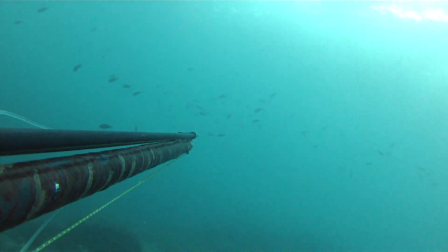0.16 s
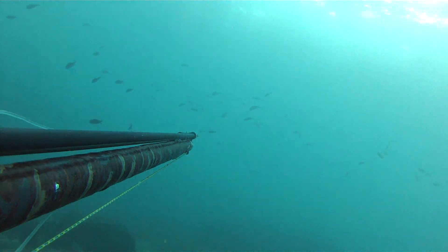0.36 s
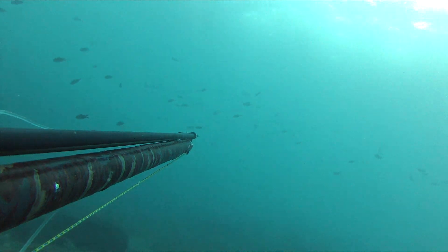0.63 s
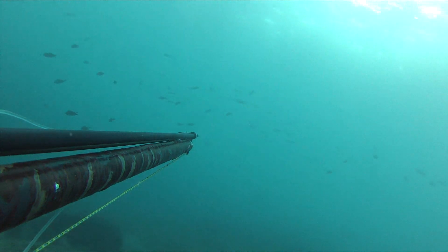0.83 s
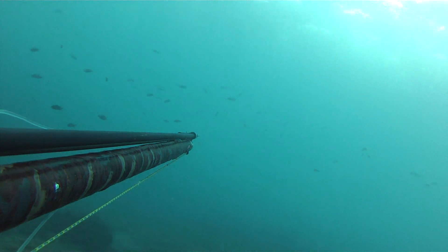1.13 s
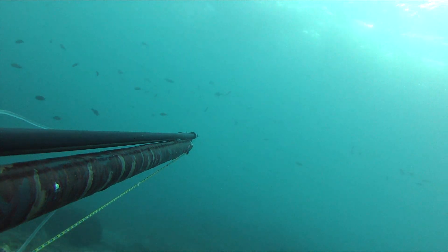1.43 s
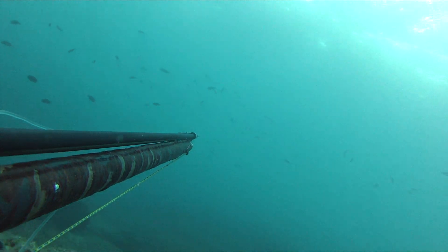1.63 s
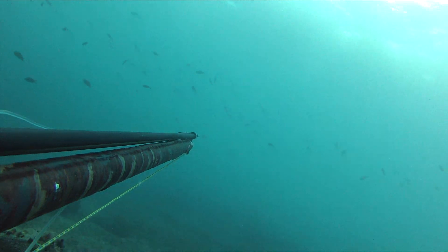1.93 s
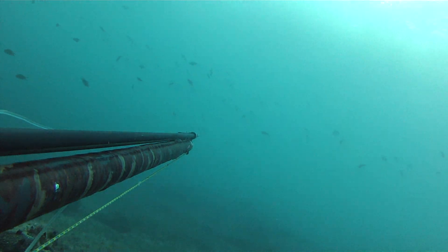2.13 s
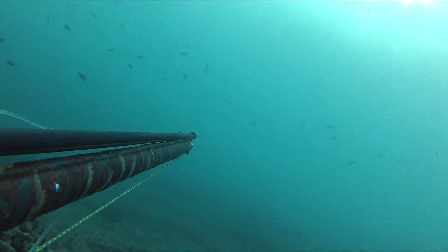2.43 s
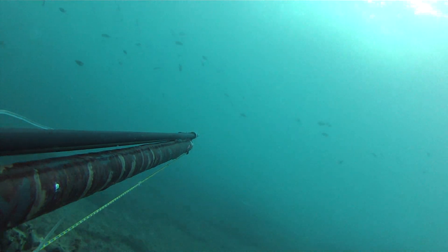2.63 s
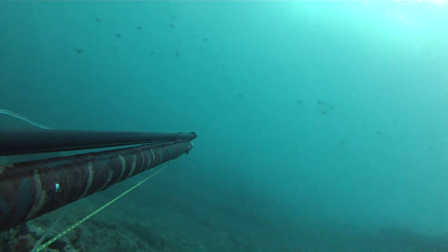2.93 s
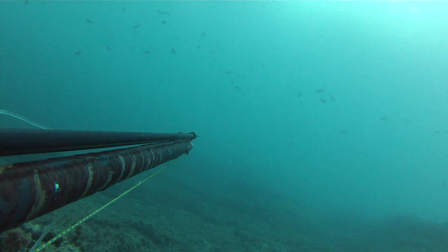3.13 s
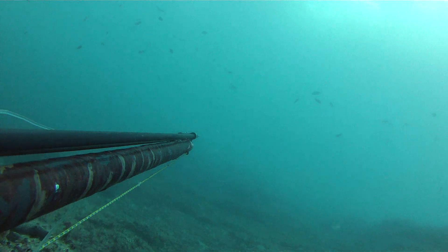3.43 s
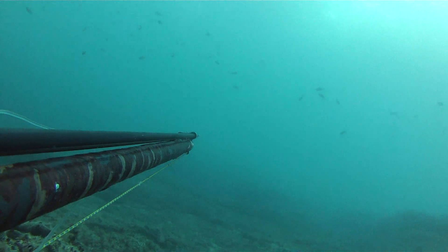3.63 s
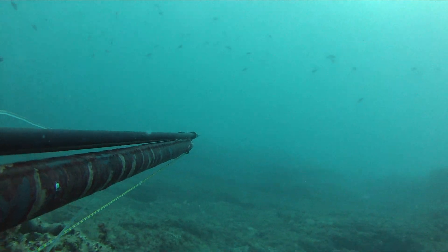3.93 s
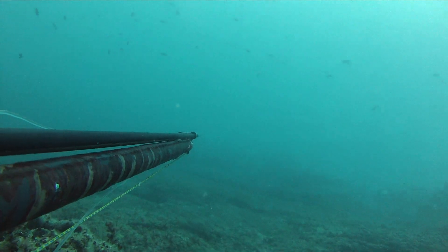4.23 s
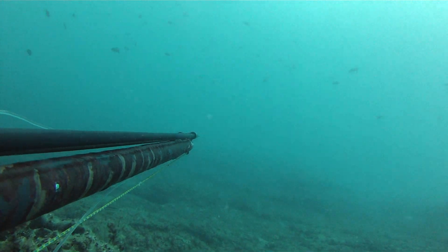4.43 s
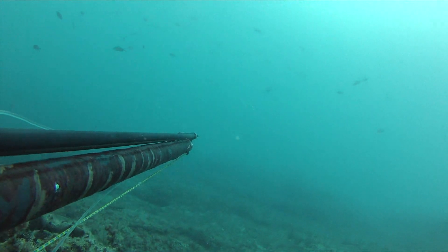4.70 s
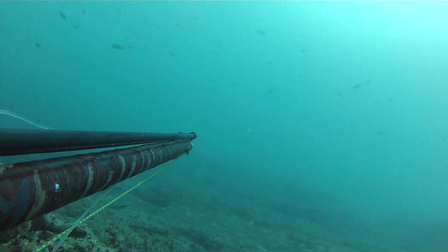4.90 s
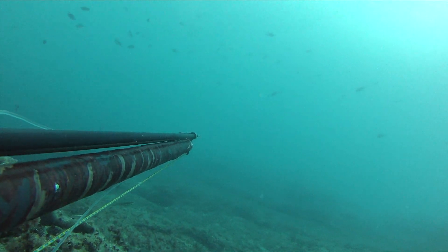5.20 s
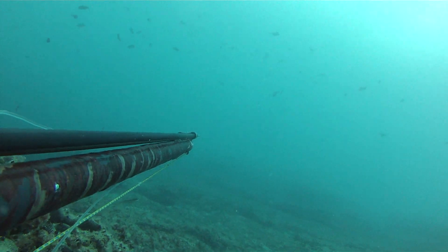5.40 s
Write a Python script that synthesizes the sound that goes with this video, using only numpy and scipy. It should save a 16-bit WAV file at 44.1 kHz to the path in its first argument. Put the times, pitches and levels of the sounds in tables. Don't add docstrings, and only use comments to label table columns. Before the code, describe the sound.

Muffled underwater scene: steady fine snapping, sharper nearby cracks, and squeaky handling bumps and thuds, thickest just before three seconds.

```python
import sys
import numpy as np
from scipy import signal
from scipy.io import wavfile
from scipy.ndimage import uniform_filter1d

SR = 44100
rng = np.random.default_rng(int(sys.argv[2]) if len(sys.argv) > 2 else 0)


def amplitude_ratio(level_db):
    exponent = np.asarray(level_db, float) / 20
    return 10 ** exponent


def dump_mix(stems):
    frames = np.atleast_2d(stems).T
    limited = np.clip(frames, -1, 1)
    pcm = np.round(limited * 32767).astype(np.int16)
    wavfile.write(sys.argv[1], SR, pcm)


N = 245195

# time in seconds, peak in dB, wall mode in Hz, lid re peak in dB.
SLIPS = [(0.6, -27, 590, -11), (0.768, -35, 635, -10), (0.795, -37, 540, -3), (0.848, -28.5, 552, -3),
         (0.88, -30, 530, -7.5), (1.158, -53, 646, 11.5), (1.196, -29.5, 636, -11), (1.475, -30.5, 632, -9),
         (1.544, -33.5, 614, 2.5), (1.822, -22.5, 614, -8.5), (1.944, -45, 596, 3), (2.309, -43, 540, 7),
         (2.435, -36, 520, -2.1), (2.467, -13, 635, -4.5), (2.588, -19, 586, -4), (2.631, -24, 592, -8),
         (2.657, -13, 584, -7), (2.678, -12, 560, -6), (2.7, -14.5, 603, -5.5), (2.729, -25.5, 514, 3.5),
         (2.76, -8.5, 562, -7), (2.785, -21.5, 510, -8), (2.816, -20, 584, -10), (3.275, -52.5, 447, 13),
         (3.835, -28.5, 648, -17), (4.173, -36, 573, -9), (4.847, -32.5, 635, -11), (5.06, -30.5, 631, -9),
         (5.342, -30, 615, -12.5)]
# frequency in Hz, bandwidth in Hz, level in dB.
LID = [(812, 61, -14), (929, 49, -2), (1033, 55.5, 0), (1208, 53.4, 1), (1285, 54, 5.5), (1332, 101, 2.5),
       (1425, 84, -1), (1998, 86, -12.5), (2367, 78, -16.5), (2930, 87, -27), (3700, 340, -23.5)]
# frequency in Hz, bandwidth in Hz, level in dB.
PORT = [(1175, 97, 2.5), (1680, 144, -4), (2006, 51, 0.5), (2219, 110, -0.5), (2800, 295, -3.5),
        (3600, 188, -1), (4130, 294, -2.5), (5284, 520, -4), (6390, 460, -5), (7270, 640, -5.5),
        (7950, 4100, -13.5), (11400, 1300, -41.5)]


def rms_one(x):
    return x / np.sqrt(np.mean(x ** 2) + 1e-20)


def drift(rate):
    r = np.exp(-80 * np.pi * rate / SR)
    steps = rng.standard_normal(N // 40 + 2002)
    slow = signal.lfilter([1], [1, -2 * r, r * r], steps)[2000:]
    return np.interp(np.arange(N) / 40, np.arange(len(slow)), rms_one(slow))


def resonance(x, hz, width_hz):
    r = np.exp(-np.pi * width_hz / SR)
    zeros = np.array([1, 0, -1]) * (1 - r * r) / 2
    poles = [1, -2 * r * np.cos(2 * np.pi * hz / SR), r * r]
    return signal.lfilter(zeros, poles, x)


def body(x, modes):
    return sum((-1) ** k * amplitude_ratio(db) * resonance(x, hz, width) for k, (hz, width, db) in enumerate(modes))


def band(x, kind, hz, order=2):
    return signal.sosfilt(signal.butter(order, hz, kind, fs=SR, output="sos"), x)


def grains(per_s, spread_db):
    signs = rng.choice([-1, 1], N)
    sizes = amplitude_ratio(spread_db * np.minimum(rng.exponential(1, N), 4)) * signs
    return sizes * (rng.random(N) < per_s / SR) + 1e-18


def add(out, s, sound, peak_db):
    at = round(s * SR)
    out[at:at + len(sound)] += (amplitude_ratio(peak_db) * sound / np.max(np.abs(sound)))[:N - at]


def swells(start_s, hold_s, peak_db, rest_db, rise_db_per_s, fall_db_per_s):
    t = np.arange(0, N, 64)[:, None] / SR
    rise_db = rise_db_per_s * np.maximum(start_s - t, 0)
    fall_db = fall_db_per_s * np.maximum(t - start_s - hold_s, 0)
    power = amplitude_ratio(2 * rest_db) + amplitude_ratio(2 * (peak_db - rise_db - fall_db)).sum(axis=1)
    return np.interp(np.arange(N) / SR, t[:, 0], np.sqrt(power))


def knock(t, hz, rise_s, fall_s):
    swell = np.sin(np.pi / 2 * np.clip(t / rise_s, 0, 1)) ** 2
    ring_out = np.exp(-(np.maximum(t - rise_s, 0) / fall_s) ** 2)
    return np.sin(2 * np.pi * hz * t) * swell * ring_out


def hiss():
    shared_db, apart_db, tilt = -65, -72, 0.62
    shared, apart = band(rng.standard_normal((2, N)), "high", 210)
    shared = amplitude_ratio(shared_db) * rms_one(signal.lfilter([1], [1, -tilt], shared))
    return shared + amplitude_ratio(apart_db) * band(apart, "low", 18000, order=1) * [[1], [-1]]


def rub():
    # start in seconds, hold in seconds, wall in dB, lid and barrel re wall in dB.
    strokes = [(0.0, 0.18, -50.5, -1.7, -7.5), (0.218, 0.087, -72, -2, 8), (0.626, 0.047, -44, -9.5, -23),
               (0.65, 0.017, -52, 8.5, -15), (0.702, 0.1, -62.5, -4, -1), (0.84, 0.059, -56, -5.5, 2),
               (1.497, 0.58, -58.5, -6, -4), (1.552, 0.011, -51.5, -12, 2.5),
               (1.813, 0.21, -48.5, -5.5, -6), (2.083, 0.53, -59.5, -4.5, -2),
               (2.46, 0.36, -40, -3.5, -6.5), (2.65, 0.024, -45, 9, -15.5), (2.84, 0.083, -53, -5.5, -3.5),
               (3.003, 0.22, -59.5, -12, -9), (3.482, 0.036, -39.5, -1.5, -16),
               (3.575, 0.25, -49, -12, -9.5), (3.855, 0.012, -39, 1, -14), (3.882, 0.085, -43, -6, -6),
               (3.993, 0.24, -62, -11, -3), (4.261, 0.099, -50, -6.5, -6.5)]
    resting_db = (-63.5, -66.5, -72.5)
    # frequency in Hz, bandwidth in Hz, level in dB.
    wall_modes = [(419.6, 144, -16), (496.7, 36, -2.5), (538, 37, -0.5), (635, 42, 0)]
    # frequency in Hz, bandwidth in Hz, level in dB.
    barrel_modes = [(123, 44.5, 1), (203.6, 21.3, 0), (296.6, 52, 0)]
    rise_db_per_s, fall_db_per_s = 313, 283
    s, hold_s, db, lid_db, barrel_db = np.transpose(strokes)
    on_wall, on_lid, on_barrel = (swells(s, hold_s, db + re_db, rest_db, rise_db_per_s, fall_db_per_s)
                                  for re_db, rest_db in zip((0, lid_db, barrel_db), resting_db))
    uneven = rms_one(grains(3000, spread_db=3.5)) * amplitude_ratio(2.36 * drift(36))
    friction = band(uneven, "low", 2840)
    wall = rms_one(band(body(friction, wall_modes), "band", [360, 720]))
    lid = rms_one(band(body(friction, LID), "high", 740))
    deep = (on_barrel * amplitude_ratio(45)) ** 0.073 * body(friction, barrel_modes[:1])
    barrel = rms_one(band(deep - body(friction, barrel_modes[1:]), "high", 116))
    return on_wall * wall + on_lid * lid + on_barrel * barrel


def reef():
    # time in seconds, peak in dB.
    shoves = [(0.03, -70), (0.27, -72), (0.88, -68), (1.57, -63), (1.87, -76), (2.12, -75), (2.46, -61),
              (2.7, -57), (2.8, -54.5), (3.47, -65), (3.89, -54), (4.1, -56.5)]
    crackle_db, calm_db = -60.5, -76.5
    rise_db_per_s, fall_db_per_s = 152, 69
    sway_hz, sway_s = 30.2, 0.036
    t = np.arange(round(0.044 * SR)) / SR
    shape = np.exp(-t / 0.0009) + amplitude_ratio(-9.5) * np.exp(-t / 0.0075)
    clicks = amplitude_ratio(-8) * rng.standard_normal(N)
    for hz in (2340, 3230, 4970, 6750, 7800):
        echo = rms_one(resonance(rng.standard_normal(len(t)) * shape, hz, 1.1 * hz))
        born = grains(60 * amplitude_ratio(4.6 * drift(6)), spread_db=5)
        clicks = clicks + 0.28 * rms_one(signal.fftconvolve(born, echo)[:N])
    crackle = rms_one(band(body(clicks, PORT), "high", 1500))
    surge = rms_one(band(band(rng.standard_normal(N), "low", 41, order=3), "high", 10))
    s, db = np.transpose(shoves)
    coarse = np.arange(0, N, 64)
    since = coarse / SR - s[:, None]
    sway = np.sum(np.cos(2 * np.pi * sway_hz * since) * np.exp(-(since / sway_s) ** 2), axis=0)
    surge = surge + 1.1 * np.interp(np.arange(N), coarse, sway)
    push = swells(s, 0, db, calm_db, rise_db_per_s, fall_db_per_s)
    return amplitude_ratio(crackle_db) * crackle + push * surge


def thuds():
    # time in seconds, peak in dB, mode in Hz.
    blows = [(0.031, -48, 293), (0.144, -54, 125), (0.671, -37.5, 302), (0.849, -40, 300),
             (1.339, -52, 298), (1.496, -62, 283), (1.545, -39.5, 270), (1.816, -36, 388),
             (2.412, -43, 193), (2.468, -32, 287), (2.724, -27, 347), (3.139, -45.5, 410),
             (3.436, -46.5, 286), (3.839, -43, 315), (4.062, -48.5, 154), (4.193, -49, 318),
             (4.364, -46, 316), (4.577, -41, 313), (4.661, -53.5, 148), (4.68, -46, 285),
             (4.712, -44.5, 293), (4.788, -39.5, 283), (4.845, -48.5, 420), (5.057, -40.5, 304),
             (5.282, -51, 370), (5.338, -41.5, 349), (5.427, -57, 205), (5.53, -52, 400)]
    out, t = np.zeros(N), np.arange(round(0.12 * SR)) / SR
    for (s, peak_db, hz), noise in zip(blows, rng.standard_normal((len(blows), len(t)))):
        rough = rms_one(resonance(noise, 1.2 * hz, 135)) * np.minimum(t / 0.0076, 1) * np.exp(-t / 0.015)
        add(out, s, knock(t, hz, 1.6 / hz, 2.8 / hz) + 0.59 * rough, peak_db)
    return out


def ticks():
    # time in seconds, peak in dB.
    thin_snaps = [(0.1146, -27), (0.5865, -37), (0.617, -27.5), (0.997, -32), (1.1463, -30), (1.36, -44),
                  (1.753, -36), (1.8216, -32), (1.8706, -42), (2.181, -37), (2.3096, -25.5), (2.5166, -27),
                  (3.015, -28), (3.2745, -35), (3.553, -29), (3.5804, -36), (4.0687, -36), (4.21, -46),
                  (4.318, -36), (4.1802, -29), (4.8635, -26.5)]
    out, t = np.zeros(N), np.arange(round(0.059 * SR)) / SR
    for (s, peak_db), noise in zip(thin_snaps, rng.standard_normal((len(thin_snaps), len(t)))):
        add(out, s, band(noise * np.exp(-t / 0.00092), "band", [7000, 10800]), peak_db - 14)
    return out


def snaps():
    # time in seconds, peak in dB, centre in Hz, tail re peak in dB.
    near = [(0.237, -25.5, 5150, -8.5), (0.284, -24.5, 3700, -8.5), (0.6938, -33, 6860, -5),
            (1.1574, -34, 3700, -1.5), (1.253, -26, 3420, -2.5), (1.3339, -33.5, 5570, -5.5),
            (1.3712, -29, 2520, -6.5), (1.6397, -35, 6270, -3.5), (1.7527, -24.5, 3450, -3),
            (1.793, -35, 3630, -6), (2.1794, -33, 3860, -4.5), (2.3037, -31, 2860, -10),
            (2.3079, -18.5, 3220, -2), (2.3174, -38, 3600, 1), (2.3258, -24.5, 4160, -9),
            (2.8897, -30, 3420, -15), (3.0195, -29.5, 2950, -22), (3.274, -29, 3280, -3),
            (3.2855, -29.5, 5400, -3.87), (3.4844, -30.5, 3230, -1.5), (4.1523, -33, 3930, -3),
            (4.1809, -31, 4600, -3), (4.405, -37.5, 6000, 3.5), (4.517, -35, 3700, 4),
            (4.5438, -33.5, 4230, -3.5), (4.8592, -29, 2380, -3.5), (4.8626, -25.5, 4130, -4),
            (5.1128, -31.5, 5030, 4), (5.1684, -30.5, 3600, -6), (5.36, -33, 4240, 5)]
    # time in seconds, peak in dB, centre in Hz.
    farther = [(4.462, -35, 3480), (0.261, -36.5, 2250), (0.412, -39, 5350), (0.595, -34.5, 4050),
               (0.6153, -34, 2400), (0.712, -32.5, 5000), (0.911, -38, 5200), (1.0863, -35.5, 3030),
               (1.3154, -38.5, 5560), (1.3607, -54, 2760), (1.87, -37.5, 7300), (1.8967, -35.5, 6360),
               (1.9853, -37.5, 2380), (2.1183, -37.5, 2800), (2.705, -31.5, 2120), (3.1918, -37, 3600),
               (3.5802, -38, 6470), (3.7617, -33.5, 6100), (3.784, -34.5, 5380), (5.375, -31, 5200),
               (3.99, -35, 4500), (4.0866, -35, 3700), (4.266, -36.5, 4560), (4.2856, -39, 2080),
               (4.6274, -37.5, 3580), (5.0178, -37, 2080), (5.2443, -36.5, 4200), (5.3276, -33, 3000),
               (5.4532, -36, 3440), (5.5452, -33, 4520)]
    farther_tail_db = -4
    slip_hz, slip_db, slip_tail_db = 2160, -14, -10
    table = near + [(*row, farther_tail_db) for row in farther]
    table += [(s, db + lid_db + slip_db, slip_hz, slip_tail_db) for s, db, _, lid_db in SLIPS]
    out, t = np.zeros(N), np.arange(round(0.075 * SR)) / SR
    noises = rng.standard_normal((len(table), 2, len(t)))
    for (s, peak_db, hz, tail_db), (noise, lumps) in zip(table, noises):
        scatter = amplitude_ratio(4 * rms_one(uniform_filter1d(lumps, size=70)))
        crack = (noise + 4 * (t == 0)) * np.exp(-t / 0.0009)
        tail = noise * scatter * (1 - np.exp(-(t / 0.0023) ** 2)) * np.exp(-t / 0.014)
        for part, db, top in ((crack, -0.7, 1.6), (tail, tail_db - 4.5, 1.35)):
            coloured = band(resonance(part, hz, 0.76 * hz), "low", min(top * hz, 15000))
            add(out, s, body(coloured, PORT), peak_db + db)
    return band(out, "high", 670)


def slips():
    # time in seconds, peak in dB, wall mode in Hz.
    creeps = [(0.615, -27.5, 583), (0.638, -28, 576), (0.654, -21, 590), (0.671, -21, 600),
              (0.686, -26, 591), (0.739, -29, 586), (0.91, -29.5, 633), (1.347, -32.5, 599),
              (1.592, -31, 590), (1.846, -26, 543), (1.989, -48, 510), (2.294, -33.5, 626),
              (2.521, -35, 544), (2.558, -35, 605), (3.077, -34.5, 635), (3.443, -28.5, 593),
              (3.471, -25, 596), (3.526, -18, 601), (3.613, -26, 533), (3.639, -25, 575),
              (3.672, -25.5, 534), (3.746, -26.5, 586), (3.824, -49, 580), (3.882, -20.5, 615),
              (3.924, -26, 632), (4.579, -33.5, 654), (5.29, -35.5, 545)]
    slip_rise_s, creep_rise_s, creep_lid_db = 0.0029, 0.006, -22
    ring_s, ring_per_rest, ring_max_s = 0.0017, 0.3, 0.012
    table = [(*row, slip_rise_s) for row in SLIPS]
    table += [(*row, creep_lid_db, creep_rise_s) for row in creeps]
    table = sorted(table)
    out, t = np.zeros(N), np.arange(round(0.1 * SR)) / SR
    rests_s = np.diff([row[0] for row in table], append=N / SR)
    strengths_db = 3 * rng.standard_normal((len(table), len(LID)))
    for (s, peak_db, hz, lid_db, rise_s), rest_s, chance_db in zip(table, rests_s, strengths_db):
        fall_s = min(ring_s + ring_per_rest * rest_s, ring_max_s)
        wall = knock(t, hz, rise_s, fall_s) + 0.34 * knock(t, 0.929 * hz, rise_s, fall_s)
        lid = sum(amplitude_ratio(db + own_db) * knock(t, mode_hz, 1.06 * rise_s, 0.33 / width_hz)
                  for (mode_hz, width_hz, db), own_db in zip(LID, chance_db))
        add(out, s - 0.34 * rise_s, wall, peak_db - 9.5)
        add(out, s - 0.2145 * rise_s, lid, peak_db + lid_db - 1)
    return out


def scene():
    return hiss() + rub() + reef() + thuds() + ticks() + snaps() + slips()


def roll_off(x):
    return signal.sosfilt(signal.butter(12, 16370, fs=SR, output="sos"), x)


def record(dry):
    top_hz = 15350
    unlike = dry + amplitude_ratio(-48) * np.roll(dry, 97, axis=1) * [[1], [-1]]
    steep = signal.ellip(12, 0.5, 70, top_hz, fs=SR, output="sos")
    return roll_off(signal.sosfilt(steep, unlike))


dry = scene()
out = record(dry)
dump_mix(out)
```